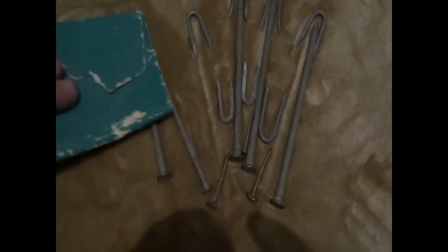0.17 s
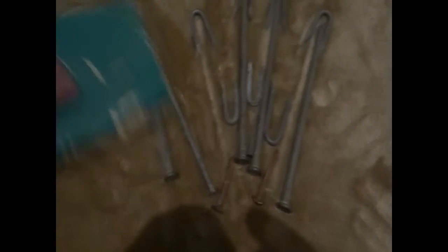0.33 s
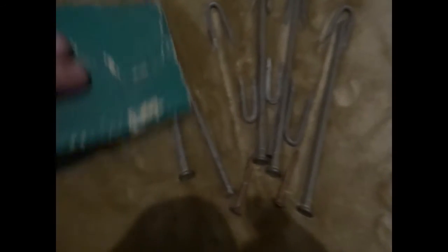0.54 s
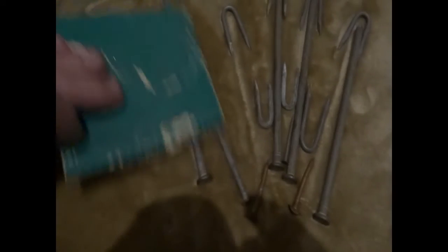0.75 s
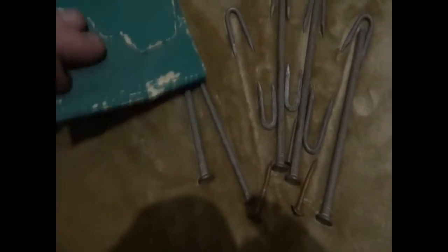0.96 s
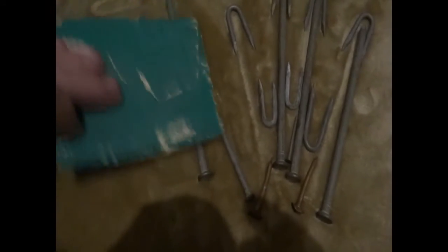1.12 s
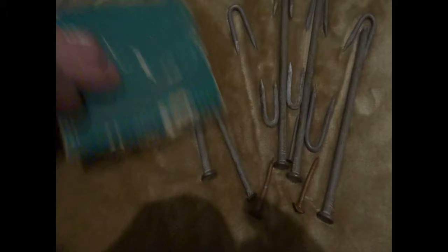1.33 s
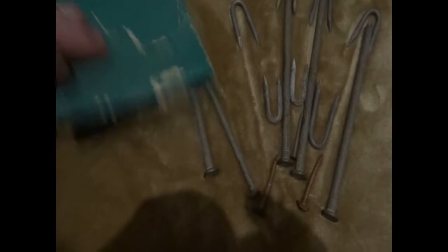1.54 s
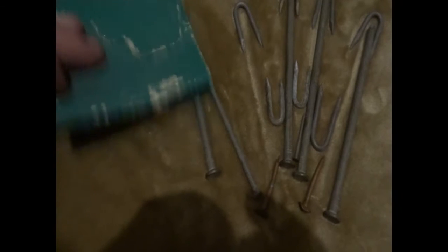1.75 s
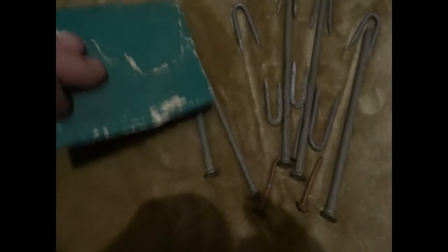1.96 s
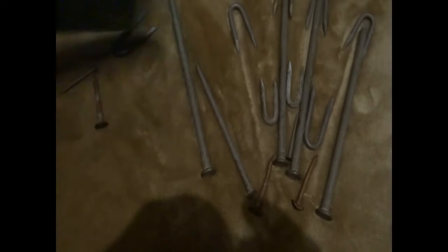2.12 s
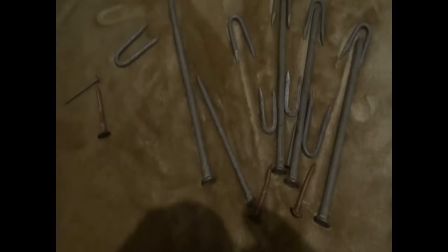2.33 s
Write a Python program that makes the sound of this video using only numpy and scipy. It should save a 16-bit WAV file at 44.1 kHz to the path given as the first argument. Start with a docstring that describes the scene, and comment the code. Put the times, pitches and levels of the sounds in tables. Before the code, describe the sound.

A gritty abrasive pad scrubs quickly to and fro over steel nails on a board, bright hissing, rasping strokes with slight metallic chatter, then a tick and faint sliding; close microphone in a small room.

```python
"""Scrubbing steel nails with an abrasive pad

A pad is rubbed quickly to and fro over nails lying on a board, close by in a small room.
In each stroke thousands of grit grains catch on the steel: noise made of tiny clicks is coloured
into hiss, rasp and board sound, and swells with the speed of the hand. Some nails chatter or tick.
At the end the pad flicks off a nail and slides away with a faint hiss; a low rumble lies underneath."""
import sys
import numpy as np
from scipy import signal
from scipy.fft import rfft, irfft, next_fast_len
from scipy.io import wavfile

SR = 44100
rng = np.random.default_rng(int(sys.argv[2]) if len(sys.argv) > 2 else 0)


def materialize(psi):
    """Save the field psi as 16-bit PCM at rate SR to the path in sys.argv[1].

    A 1-D psi becomes a single channel; in a 2-D psi each row is a channel.
    """
    bounded = np.clip(np.atleast_2d(psi).T, -1, 1)
    quanta = np.round(bounded * 32767).astype(np.int16)
    wavfile.write(sys.argv[1], SR, quanta)


N = 105443
TIME = np.arange(N) / SR   # seconds

# strokes of the pad; levels are set before the speed shapes them:
# start_s, fastest_s, end_s, hiss_db, rasp_db, board_db, hiss_tilt_db_per_octave
STROKE_TABLE = [ (-.015, 0.058, 0.076, -26.5, -33.5, -40.5, 0.5),
                (0.068, 0.091, 0.14, -20.5, -28.5, -37, 1.5), (0.08, 0.153, 0.24, -37.5, -39.5, -43, -2),
                (0.241, 0.288, 0.35, -22, -28.5, -35.5, -4.5), (0.338, 0.386, 0.48, -20.5, -26, -33, -1.5),
                (0.496, .548, .604, -24, -27, -37, -1.5), (0.574, 0.59, 0.646, -23, -29.5, -36.5, -3.5),
                (0.66, 0.788, .840, -22, -25, -33, -1.5), (0.852, 0.917, .990, -18, -24, -35, -1),
                (1, 1.049, 1.158, -18, -24.5, -35.5, 1), (1.161, 1.205, 1.25, -18, -23.5, -36, -1),
                (1.216, 1.259, 1.298, -25, -33.5, -43, -1.5), (1.318, 1.381, 1.425, -17.5, -25, -35, 2),
                (1.448, 1.491, 1.557, -19.5, -23.5, -35, 1), (1.564, 1.602, 1.665, -17, -24, -33.5, -0.5),
                (1.678, 1.705, 1.777, -18, -24.5, -36, 1), (1.769, 1.831, 1.878, -17.5, -25, -35, -2.5),
                (1.887, 1.921, 1.968, -18.5, -25, -39, -3), (1.972, 1.999, 2.026, -36, -35, -46, -3),
                (2.050, 2.078, 2.096, -38.5, -44, -52, 4.5), (2.094, 2.129, 2.137, -33, -40.5, -54, 5.5)]
# the pad skips over a nail and loses its grip: time_s, half_length_s, depth_db
SKIP_TABLE = [(0.944, 0.0059, 4.5), (1.038, 0.0055, 1), (1.512, 0.0051, 11.5), (1.595, .004, 8.5),
              (1.725, 0.0052, 6.5), (1.844, .004, 4.5)]
# spectrum of the hiss of the grit: frequency_hz, level_db
HISS_SPECTRUM = [(2500, -33), (3600, -14), (4400, -2.5), (5200, -3.5), (6400, 1), (8200, -3.5),
                 (9400, -9.5), (11000, -10.5), (13000, -21.5), (15500, -30)]
# spectrum of the rasp of the nails: frequency_hz, level_db
RASP_SPECTRUM = [(600, -32), (1150, -10.5), (1450, 3.5), (2000, 4), (2800, 1), (3400, -2.5), (4500, -9.5),
                 (8000, -56)]
# spectrum of the board underneath: frequency_hz, level_db
BOARD_SPECTRUM = [(100, -29.5), (250, -29), (350, -20), (480, -8), (670, -3), (810, -11), (1020, 8),
                  (1250, -4.5), (2200, -11.5)]
# resonances of the nails on the board (a negative lift is a dip): pitch_hz, width_hz, lift_db
NAIL_RESONANCES = [(1027, 86, -5), (1480, 30, 0.5), (1863, 43, 0.5), (2380, 35, 1), (2660, 31, -1),
                   (3420, 67, 1), (4250, 123, 2.5), (6360, 58, 0.5), (6360, 38, 0), (6870, 70, 1),
                   (8320, 67, -3.5), (8730, 60, 0), (11400, 70, -7)]
# a nail chatters under the pad: time_s, half_length_s, pitch_hz, width_hz, level_db
CHATTER_TABLE = [(0.057, 0.023, 6560, 1080, -28.5), (.305, .012, 674, 88, -30.5),
                 (0.428, 0.023, 2340, 305, -24), (1.355, 0.014, 4470, 300, -22.5),
                 (1.497, 0.02, 1480, 250, -29), (1.502, 0.039, 4500, 300, -31.5),
                 (1.737, .025, 4400, 300, -28.5)]
# the pad's edge flicks a nail: time_s, relative_level_db
FLICK_TABLE = [(0.583, -4), (0.669, -11.5), (1.319, -13), (2.1087, -1), (2.254, -20), (2.326, -22)]
# spectrum of a flick: frequency_hz, level_db
FLICK_SPECTRUM = [(200, -65), (600, -4), (1200, -12), (2100, 3.5), (3500, -8), (7000, -9), (11000, -14),
                  (15500, -26)]
# light sliding of the pad between and after the strokes: time_s, level_db
SLIDE_CURVE = [(0, -52), (.24, -54.5), (.6, -57), (1.3, -43), (1.88, -38), (2.04, -45.5), (2.17, -45),
               (2.27, -44.5), (2.35, -45.5), (2.39, -50.5)]
# spectrum of the light sliding: frequency_hz, level_db
SLIDE_SPECTRUM = [(250, -17.5), (480, -4.5), (750, -17), (1150, -6.5), (1400, -15), (2000, -14),
                  (2400, -1.5), (3250, -12.5), (3520, -1.5), (3850, -13), (4170, -3), (4400, -9),
                  (4800, -4), (5600, -4), (6450, 4), (7600, -3), (9000, -9), (10500, -8.5), (13000, -18),
                  (15500, -39)]
# level of the low rumble: time_s, level_db
RUMBLE_CURVE = [(0, -52), (.07, -65), (.24, -61), (.47, -64.5), (.68, -60.5), (.82, -68), (1.0, -69),
                (1.1, -58.5), (1.5, -58), (1.62, -66), (2.0, -65), (2.15, -57.5), (2.39, -66)]
# spectrum of the low rumble: frequency_hz, level_db
RUMBLE_SPECTRUM = [(20, -30), (40, -18), (60, -7.5), (80, 1), (105, -6), (140, -9.5), (250, -19.5),
                   (500, -20), (2000, -39)]
# left and right channels: frequency_hz, diffuse_difference_db, left_minus_right_db
STEREO_IMAGE = [(80, -26, -0.3), (220, -11.5, 1), (765, -19.5, 1.5), (1010, -29, .1), (1400, -37, 0.4),
                (1620, -25.5, .8), (2120, -32, 1), (2460, -20, 2), (4000, -22.5, 1.5), (6860, -49, 0.35),
                (8500, -29, 1.3), (9400, -19, 1.5), (10200, -42, 0.5), (12100, -50, -0.9)]

HISS_POWER, RASP_POWER, BOARD_POWER = 2.82, 2.11, 1.24   # loudness grows as speed to this power
SPEED_LEVELLING = 0.94   # the hand holds its speed through the middle of a stroke
JUDDER_DB, JUDDER_HZ = 1.5, 139   # the pad sticks and slips
PRESSURE_DB, PRESSURE_HZ = 0.7, 35.4   # uneven pressure of the fingers
CONTACT_DB, CONTACT_HZ = 3, 255   # each contact spot has its own colour: ripple depth and spacing
GRAINS_PER_S, GRAIN_SPREAD_DB = 26000, 2.15
# coarse grains that make the steel ping briefly
CATCHES_PER_S, CATCH_DB, CATCH_SPREAD_DB, CATCH_WIDTH_HZ = 1100, -2.5, 1.5, 240
FLICK_DECAY_S, FLICK_DB = 0.0021, -20.5
ROOM_DB, ROOM_T60_S, ROOM_DELAY_S = -19.5, 0.64, 0.009   # T60: time to fade by 60 dB
EARLY_T60_S = .055   # close reflections, unlike at left and right
PEAK_TOP, CUTOFF_HZ = 0.71, 15700


def strokes():
    """The hand speeds up and slows down in each stroke; grit excites hiss, rasp and board in step."""
    judder_db = JUDDER_DB * drift(JUDDER_HZ * N / SR, N)
    pressure_db = PRESSURE_DB * drift(PRESSURE_HZ * N / SR, N)
    skip_db = sum(depth_db * bump(time_s, half_s) for time_s, half_s, depth_db in SKIP_TABLE)
    grip = from_db(judder_db + pressure_db - skip_db)
    hiss = coarse_grit(3580, 12970) * grip
    rasp = coarse_grit(999, 4032) * grip
    board = grit() * grip
    out = np.zeros(N)
    window = SR // 4   # room for one stroke
    for start, fastest, end, hiss_db, rasp_db, board_db, tilt_db in STROKE_TABLE:
        first = max(int(start * SR), 0)
        part = slice(first, first + window)
        # 0 at the start, 1 when fastest, 2 at the end
        phase = np.interp(TIME[part], [start, fastest, end], [0, 1, 2])
        swing = np.abs(np.sin(np.pi / 2 * phase))
        speed = np.tanh(SPEED_LEVELLING * swing) / np.tanh(SPEED_LEVELLING)
        travel = np.clip(phase - .5, 0, 1)
        hiss_force = hiss[part] * speed ** HISS_POWER
        rasp_force = rasp[part] * speed ** RASP_POWER
        board_force = board[part] * speed ** BOARD_POWER
        out[part] += from_db(hiss_db) * rub(hiss_force, travel, HISS_SPECTRUM, tilt_db)
        out[part] += from_db(rasp_db) * rub(rasp_force, travel, RASP_SPECTRUM)
        out[part] += from_db(board_db) * rub(board_force, travel, BOARD_SPECTRUM)
    return out


def rub(force, travel, spectrum, tilt_db=0):
    """The contact moves from one spot to another along the stroke, and the colour with it."""
    first_spot = colour(force * (1 - travel), spectrum, tilt_db, CONTACT_DB)
    second_spot = colour(force * travel, spectrum, tilt_db, CONTACT_DB)
    return first_spot + second_spot


def coarse_grit(low_hz, high_hz):
    """Fine grit mixed with coarse catches, each ringing for a few milliseconds at one of 32 pitches."""
    pitches = np.linspace(low_hz, high_hz, 32) * rng.uniform(.97, 1.03, 32)
    caught = rng.random(N) < CATCHES_PER_S / SR
    sizes = from_db(CATCH_SPREAD_DB * np.minimum(rng.exponential(1, N), 3))
    catches = caught * sizes * rng.choice([-1, 1], N)
    dealt = rng.integers(0, len(pitches), N)   # which pitch each catch excites
    pings = np.zeros(N)
    for k, hz in enumerate(pitches):
        hits = catches * (dealt == k) + 1e-18   # the tiny offset keeps the filter off exact silence
        pings += signal.lfilter(*signal.iirpeak(hz, hz / CATCH_WIDTH_HZ, SR), hits)
    # grit fills the whole range, pings only this band
    share_of_band = np.sqrt((high_hz - low_hz) / (SR / 2))
    mixed = grit() + from_db(CATCH_DB) * share_of_band * rms_one(pings)
    return mixed / np.hypot(1, from_db(CATCH_DB))


def grit():
    """A dense run of tiny catches of uneven size, scaled to an average strength (rms) of 1."""
    caught = rng.random(N) < GRAINS_PER_S / SR
    sizes = from_db(GRAIN_SPREAD_DB * np.minimum(rng.exponential(1, N), 6))
    return rms_one(caught * sizes * rng.choice([-1, 1], N))


def nails(x):
    """The damped nails ring with the scratching: most pitches are lifted, some are dipped."""
    for hz, width, lift_db in NAIL_RESONANCES:
        ringing = signal.lfilter(*signal.iirpeak(hz, hz / width, SR), x)
        x = x + (from_db(lift_db) - 1) * ringing
    return x


def chatters():
    """A loose nail buzzes briefly: grit noise passes through one narrow resonance."""
    grains = grit()
    out = np.zeros(N)
    for time_s, half_s, hz, width, db in CHATTER_TABLE:
        buzz = rms_one(signal.lfilter(*signal.iirpeak(hz, hz / width, SR), grains))
        out += from_db(db) * bump(time_s, half_s) * buzz
    return out


def flicks():
    """Short dry ticks: bursts of grit noise that start at once and are quickly damped by the pad."""
    force = np.zeros(N)
    for time_s, db in FLICK_TABLE:
        decay = np.exp(-np.abs(TIME - time_s) / FLICK_DECAY_S)
        force += from_db(db + FLICK_DB) * (TIME >= time_s) * decay
    return colour(force * grit(), FLICK_SPECTRUM)


def slide():
    """Faint smooth hiss of the pad moving without pressure: coloured noise with a changing level."""
    level = from_db(np.interp(TIME, *np.transpose(SLIDE_CURVE)))
    return level * colour(rng.standard_normal(N), SLIDE_SPECTRUM)


def echoes(x, t60):
    """Diffuse reflections of unit power: after a short delay, a noise tail that dies away."""
    t = TIME[:SR // 2]
    tail = rng.standard_normal(len(t)) * from_db(-60 * t / t60) * (t > ROOM_DELAY_S)
    return signal.fftconvolve(x, tail / np.sqrt(np.sum(tail ** 2)))[:N]


def rumble():
    """A faint low rumble swells and sinks: low coloured noise with a changing level."""
    level = from_db(np.interp(TIME, *np.transpose(RUMBLE_CURVE)))
    return level * colour(rng.standard_normal(N), RUMBLE_SPECTRUM)


def colour(x, points, tilt_db=0, ripple_db=0):
    """Filter of unit power, never sounding early, with a spectrum, tilt per octave and random ripple."""
    size = 2 * next_fast_len(len(x) // 2 + 2048)
    hz = np.maximum(np.fft.rfftfreq(size, 1 / SR), 1)
    at, level = np.transpose(points)
    db = np.interp(np.log(hz), np.log(at), level) + tilt_db * np.log2(np.clip(hz, at[0], at[-1]))
    # outside the given points the level falls by 18 dB per octave
    octaves_outside = np.log2(np.maximum(np.maximum(at[0] / hz, hz / at[-1]), 1))
    db = db - 18 * octaves_outside
    ripple = ripple_db * drift(SR / 2 / CONTACT_HZ / 2, len(hz))
    gain = rms_one(from_db(db + ripple))
    # folding the cepstrum (the spectrum of the log gain) makes the filter respond only afterwards
    cepstrum = irfft(np.log(gain + 1e-6))
    cepstrum[1:size // 2] *= 2
    cepstrum[size // 2 + 1:] = 0
    return irfft(rfft(x, size) * np.exp(rfft(cepstrum)))[:len(x)]


def weigh(x, hz, gain):
    """Weight each frequency by a gain joined between the given points."""
    size = 2 * next_fast_len(N // 2 + 2048)
    bins = np.maximum(np.fft.rfftfreq(size, 1 / SR), 1)
    return irfft(rfft(x, size) * np.interp(np.log(bins), np.log(hz), gain))[:N]


def drift(cycles, count):
    """Smooth random wandering of spread 1 with about so many turns over count points."""
    r = np.exp(-2 * np.pi * cycles / count)
    noise = rng.standard_normal(2 * count)
    smooth = signal.lfilter([1], [1, -2 * r, r * r], noise)
    return rms_one(smooth[count:])   # the first half lets the filter settle


def bump(time_s, half_s):
    """A smooth bell in time."""
    return np.exp(-((TIME - time_s) / half_s) ** 2)


def from_db(db):
    """Decibels to gain."""
    return 10 ** (np.asarray(db) / 20)


def rms_one(x):
    """Scale to an average strength (rms) of 1."""
    return x / np.sqrt(np.mean(x ** 2) + 1e-20)


def scene():
    """The scratching is near the middle, with a little room around it."""
    near = nails(strokes() + flicks() + slide()) + chatters()
    room = from_db(ROOM_DB) * echoes(near, ROOM_T60_S)
    mid = near + room + rumble()
    hz, diffuse_db, pan_db = np.transpose(STEREO_IMAGE)
    side = weigh(echoes(mid, EARLY_T60_S), hz, from_db(diffuse_db))
    left = weigh(mid, hz, from_db(pan_db / 2)) + side
    right = weigh(mid, hz, from_db(-pan_db / 2)) - side
    return np.array([left, right])


def record(dry):
    """The highest peaks are rounded and the top of the treble is cut steeply."""
    rounded = PEAK_TOP * np.tanh(dry / PEAK_TOP)
    treble_cut = signal.ellip(12, .1, 80, CUTOFF_HZ, fs=SR, output="sos")
    return signal.sosfilt(treble_cut, rounded)


dry = scene()
out = record(dry)
materialize(out)
```